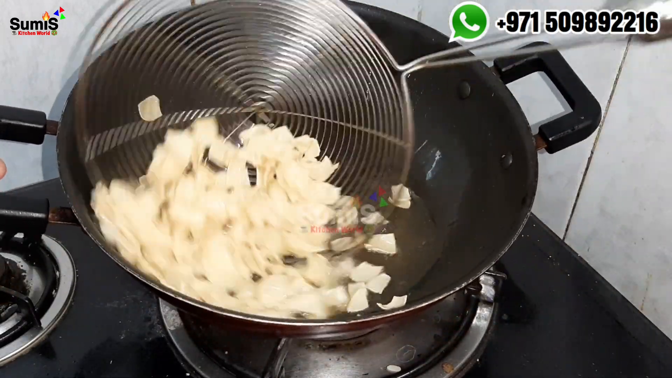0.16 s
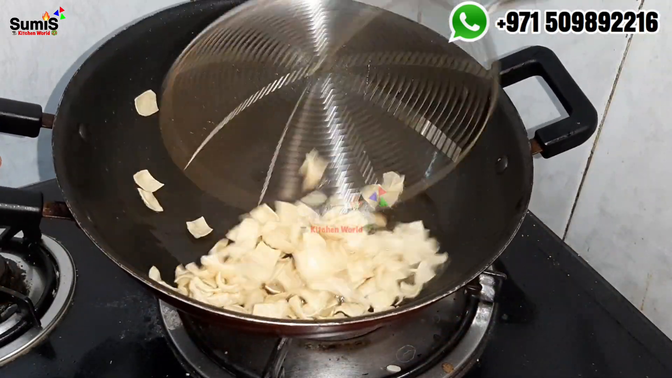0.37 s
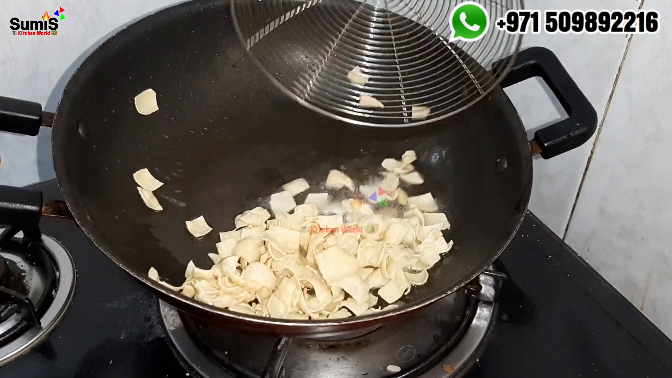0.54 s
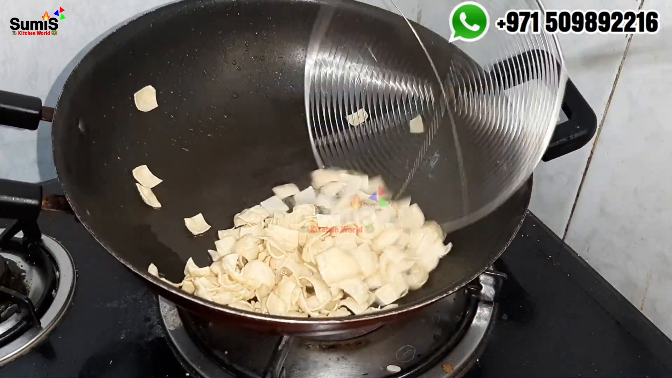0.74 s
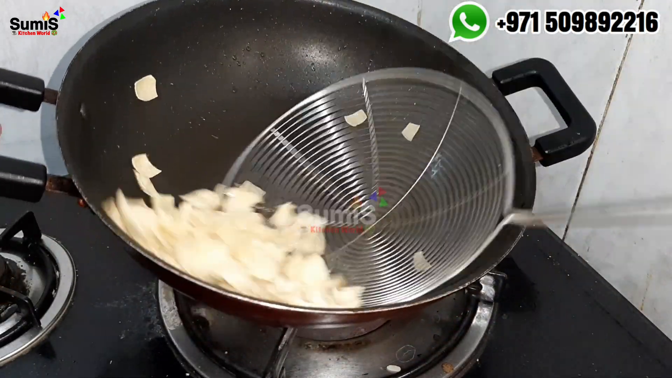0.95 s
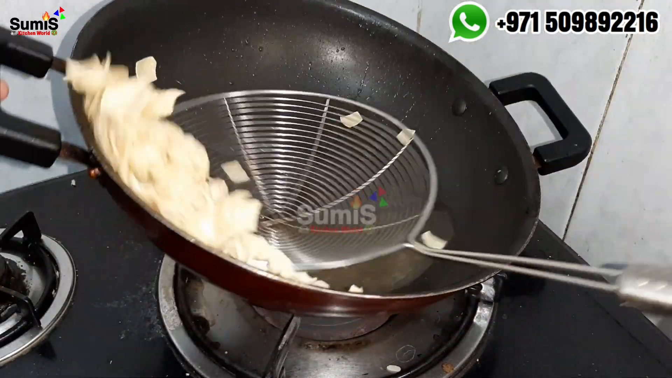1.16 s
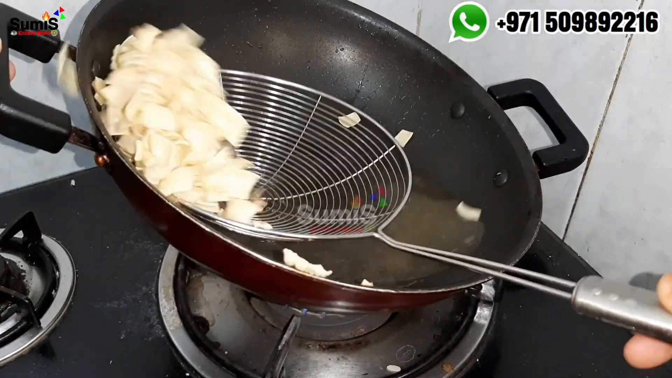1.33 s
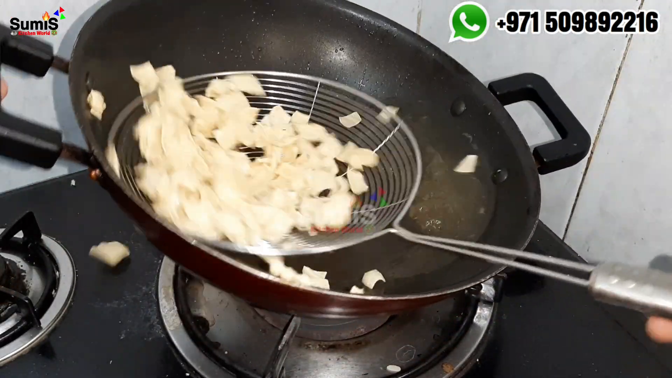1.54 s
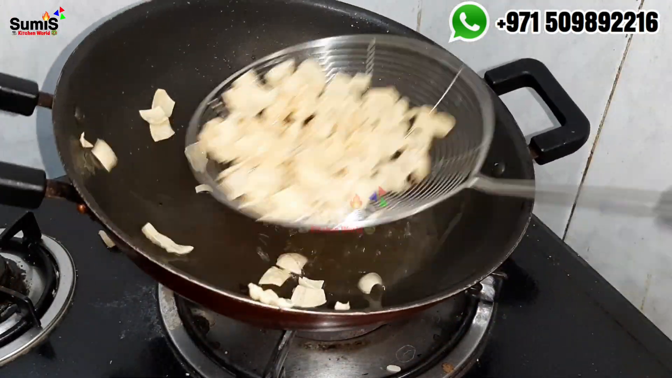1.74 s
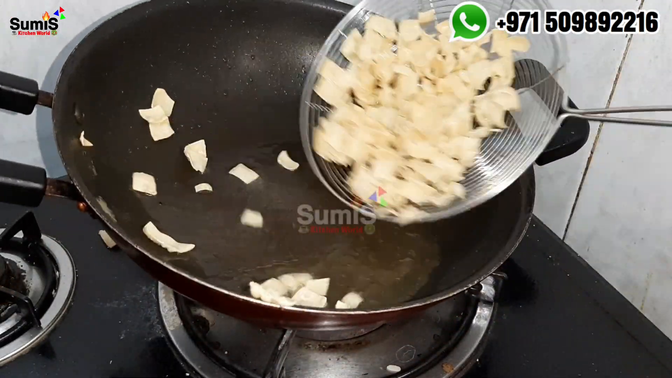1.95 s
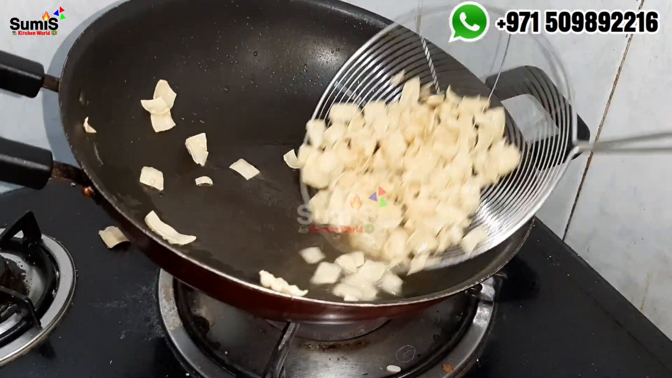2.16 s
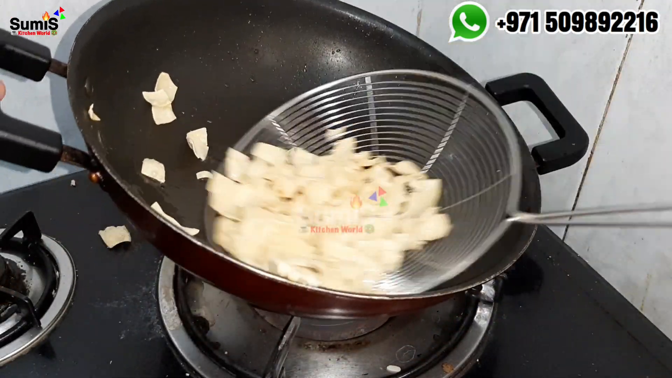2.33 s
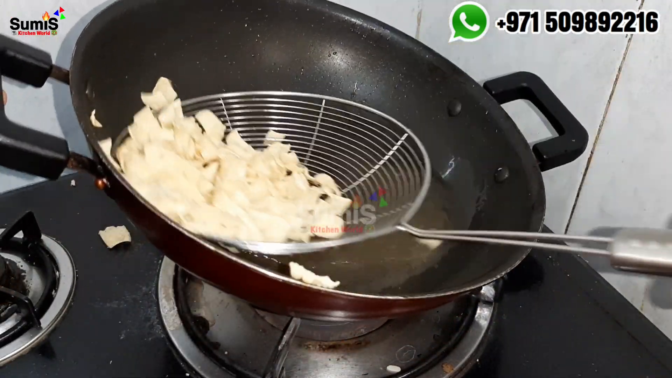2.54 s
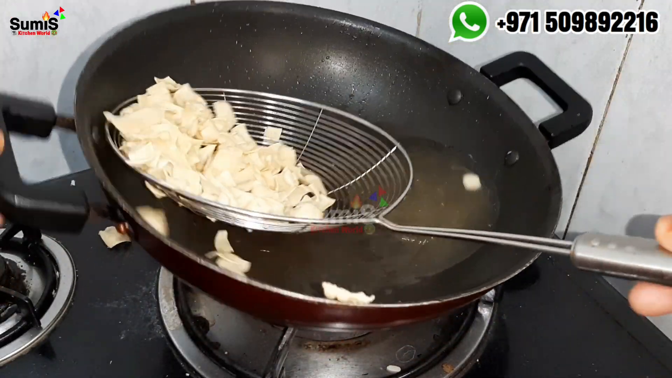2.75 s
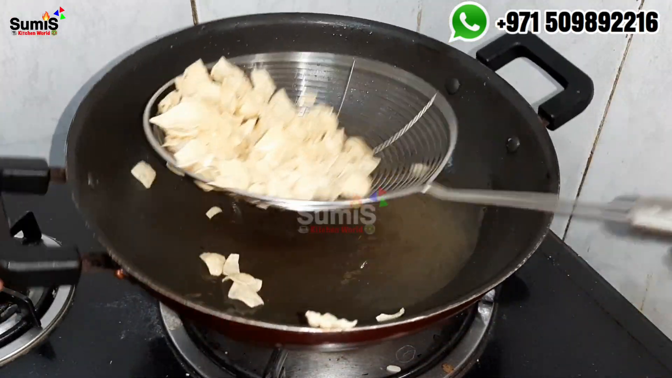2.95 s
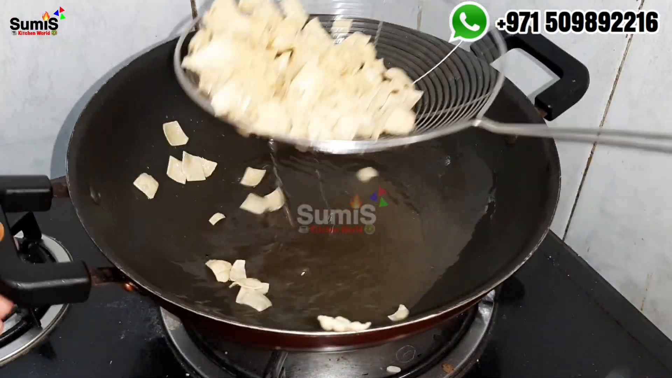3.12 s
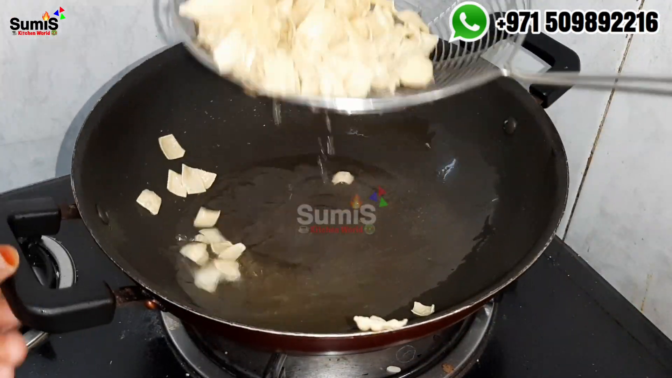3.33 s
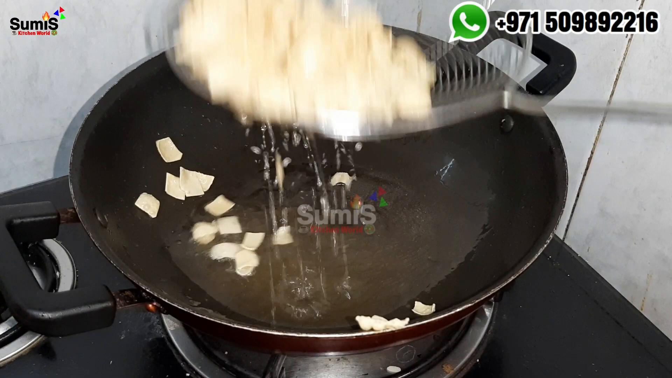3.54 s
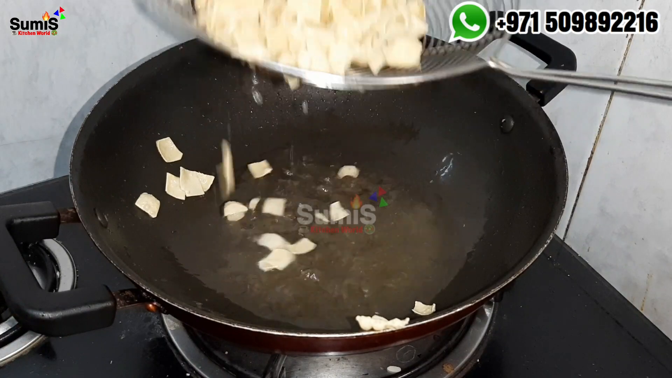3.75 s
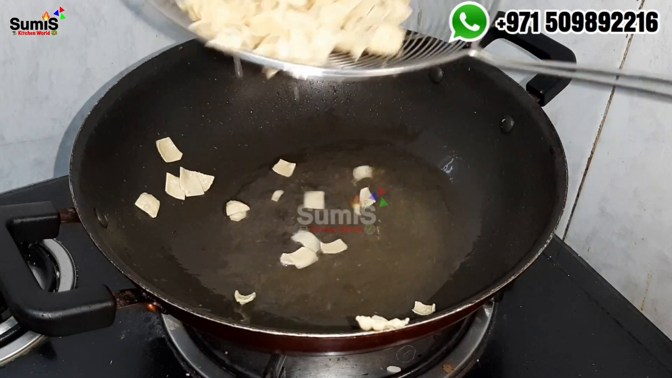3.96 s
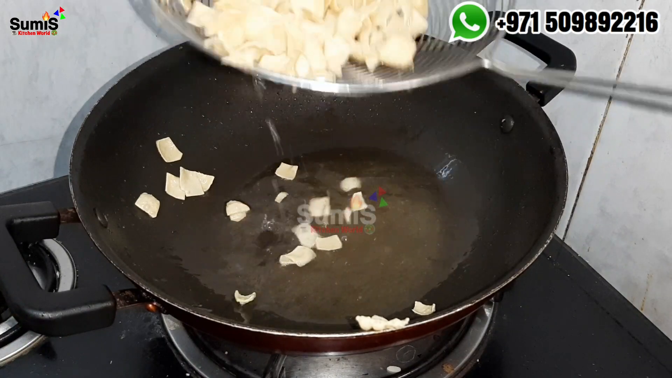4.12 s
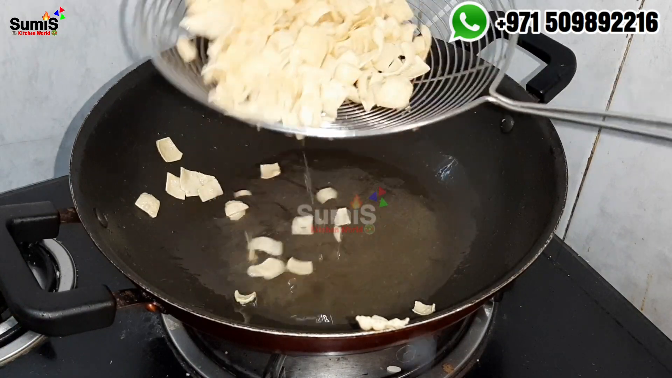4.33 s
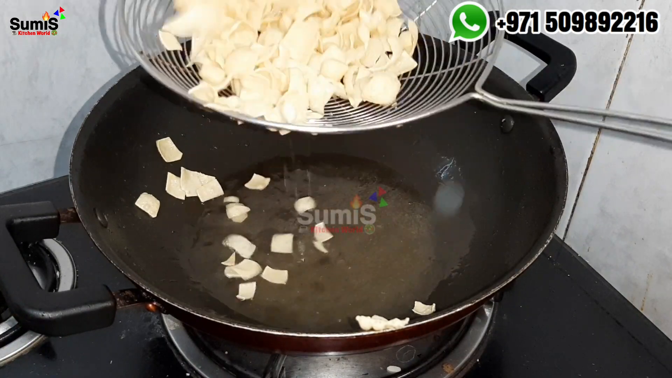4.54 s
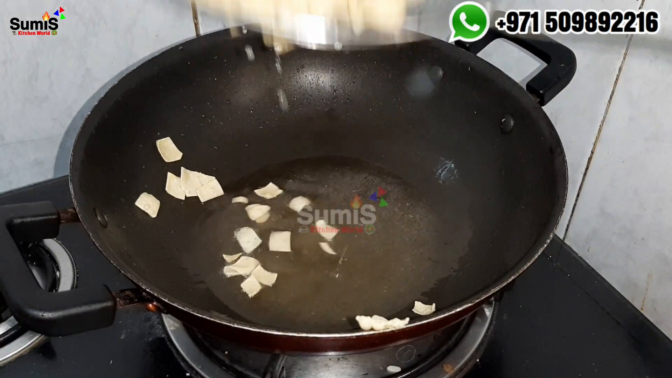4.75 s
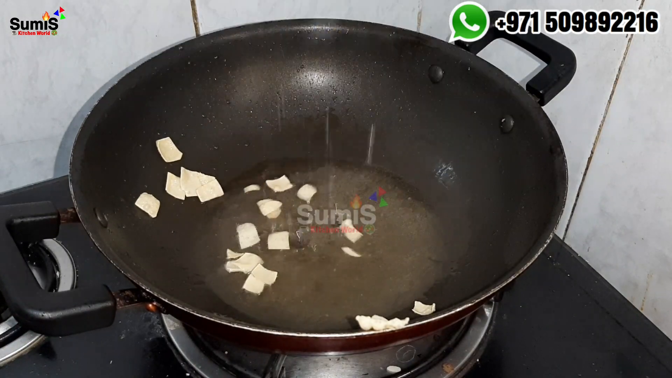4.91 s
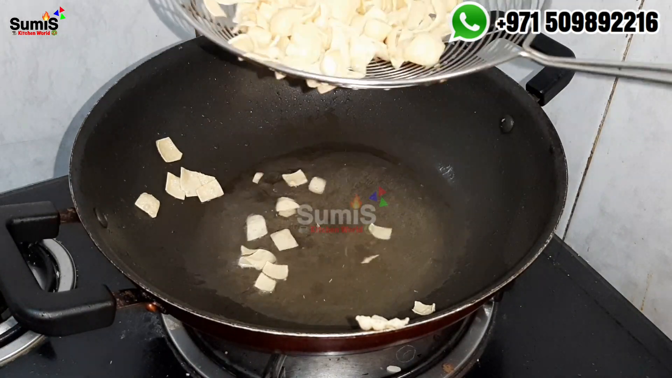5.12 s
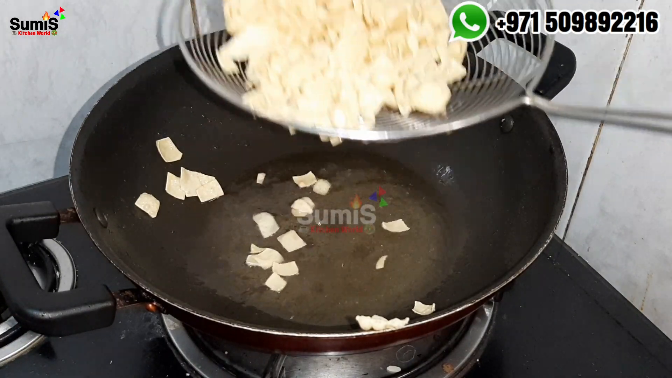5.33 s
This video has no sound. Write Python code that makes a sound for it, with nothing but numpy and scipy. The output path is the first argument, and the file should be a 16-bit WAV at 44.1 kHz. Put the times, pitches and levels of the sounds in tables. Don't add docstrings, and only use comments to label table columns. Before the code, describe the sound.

In a small tiled kitchen, food fries in an iron wok over a low gas roar. A wire strainer scrapes and raps quickly, oil pops, rods clink on the rim and one tap rings hard. At three seconds the wok clanks on its burner ring; the flame swells, then the sizzle fades with a few light knocks and ticks. Close stereo phone pickup.

```python
import sys
import numpy as np
from scipy import signal
from scipy.fft import rfft, irfft
from scipy.io import wavfile
from scipy.ndimage import uniform_filter1d

SR = 44100
rng = np.random.default_rng(int(sys.argv[2]) if len(sys.argv) > 2 else 0)


def gain_from_db(level_db):
    decades = np.asarray(level_db, float) / 20
    return 10 ** decades


def dump(signal):
    limited = np.clip(np.atleast_2d(signal).T, -1, 1)
    pcm = np.round(limited * 32767).astype(np.int16)
    wavfile.write(sys.argv[1], SR, pcm)


N = 237301
TIME_S = np.arange(N) / SR

# [f/Hz, left-right correlation]
PORT_LIKENESS = [(25, .998), (60, 1), (250, 0.94), (500, 0.58), (1000, 0.071), (2000, 0.024),
                 (5000, 0.0069), (15000, 0.013)]
# [f/Hz, left minus right/dB]
PORT_TILT = [(60, -9), (110, -2.5), (200, -14), (380, -1), (700, -14), (1290, -8.5), (2380, -6.5),
             (4400, -16), (8120, -6.5), (15000, -9)]
# [f/Hz, t60/s]
TILE_T60 = [(100, .5), (500, .42), (2000, .34), (5000, .33), (8000, .28), (12000, .17)]
# [t/s, level/dB]
FLAME_LEVEL = [(0.0, -51), (0.37, -48), (0.61, -43), (0.81, -45.5), (1.36, -46.5), (1.54, -48.5),
               (2.61, -52.5), (3.1, -40.5), (3.46, -46), (3.8, -44.5), (3.95, -49), (5.38, -54)]
# [f/Hz, density/dB per Hz]
ROAR_SPECTRUM = [(16, -42), (28, -84), (47, -2.5), (92, 1), (151, -1.5), (172, -7), (199, -6), (270, -16.5),
                 (294, -19), (340, -10), (423, -12), (462, -24), (599, -20.5), (756, -25), (900, -26.5),
                 (1170, -41), (1980, -120)]
# [f/Hz, width/Hz, rms level/dB]
HUM_LINES = [(63.9, 13.4, -58), (97.08, 3.6, -54.5), (149.8, 1.86, -62.5), (199.7, 8.6, -63.5),
             (337.7, 21, -68.5), (420, 6.7, -73.5), (1547, 74, -71)]
# [t/s, peak level/dB, f/Hz, rattle/dB, t60/s]
STOVE_BUMPS = [(0.019, -26, 117, -16, 0.24), (0.419, -43, 122, -23, 0.28), (0.563, -39, 112, -32, 0.16),
               (1.426, -38, 96, -14, 0.58), (2.039, -28.5, 115, 1.5, 0.3), (2.4, -44.5, 101, -33, 0.89),
               (3.045, -37.5, 139, -30, 0.33), (3.719, -42, 169, -12.5, 0.17),
               (3.798, -30.5, 140, -12.5, 0.27), (4.434, -32, 157, -13, 0.29), (4.791, -44, 127, -34, 0.37),
               (5.089, -46.5, 113, -34, 0.32)]
# [t/s, peak level/dB, crack above it/dB, crack f/Hz, dulling/dB per octave]
WOK_KNOCKS = [
    (3.0379, -7.5, 0, 3170, 2.5),
    (3.422, -27.5, -9.5, 1850, 4.5),
]
# [f/Hz, level/dB, t60/s]
WOK_MODES = [(324.5, -3.5, 0.33), (378.5, -1.5, 0.36), (444, -2.5, 0.21), (483.6, -1.5, 0.32),
             (592.4, -4, 0.38), (648, -16, 0.77), (820, -27, .25), (890, 2, 0.12), (1051, -5, 0.27),
             (1490, -5, 0.36), (1543, 5.5, 0.13), (2060, 14, 0.046), (2062, -1, 0.053), (3310, 2.5, 0.13),
             (3860, -23, 0.18)]
# [t/s, peak level/dB, ring length factor]
ROD_CLINKS = [
    (1.4341, -30, 0.89),
    (2.4944, -19.5, 0.79),
]
# [f/Hz, level/dB, t60/s]
ROD_MODES = [(3970, 0, .17), (4030, -7, .12), (4240, -7, .12), (4800, -11, .1), (3720, -11, .1),
             (5400, -16, .04), (7700, -14, .04), (8390, -13, .04)]
# [t/s, peak level/dB, ring above tick/dB, ring length factor, struck spot f/Hz]
RIM_TAPS = [(0.2572, -27, 1.5, 0.55, 1720), (0.5543, -18.5, -3, 0.76, 1354), (.601, -25, -1.5, 0.54, 1890),
            (0.665, -16, -10, 0.29, 850), (0.7279, -15, -13.5, 0.39, 1860), (.847, -53.5, 0, 0.41, 1200),
            (2.0046, -24, -6, 0.54, 1250), (2.0234, -31, -10, 0.31, 1300),
            (2.0398, -5.5, -10.5, 1.07, 1250), (2.2411, -22.5, -9.5, 1.8, 1250),
            (2.7394, -24, -22, 0.69, 1260), (4.6817, -32.5, -1.5, 0.31, 2440),
            (5.051, -30.5, -14.5, 0.23, 3700)]
# [f/Hz, level/dB, t60/s]
WIRE_MODES = [(1185, 12, 0.16), (1246, -2.5, 1), (1247, 12, 0.33), (850, 13.5, 0.19), (1350, 1, 0.96),
              (1560, -33, .15), (1706, 18.5, 0.12), (2036, 23, 0.19), (2128, 20.5, 0.11), (2430, 23, 0.081),
              (2900, 11, 0.22), (3560, -21, .12), (4370, -4, .2), (5060, 12, .15), (5370, -8, .12),
              (5800, -16, .1), (6500, -32, .15), (7060, -12.5, .15)]
# [t/s, length/s, grit level/dB, wire ring above it/dB, wall rub above it/dB]
WIRE_STROKES = [
    (0.011, 0.041, -42.5, -20, 4.5),
    (0.57, 0.19, -49.5, 6, 4.5),
    (0.715, 0.025, -29, -18, -7),
    (.805, 0.04, -36, -9, -33),
    (1.03, 0.036, -44, -15, -13),
    (1.285, .03, -66, 24, -4),
    (1.445, 0.014, -57, 15, -2),
    (2.244, 0.012, -44.5, 11, -30),
    (2.696, 0.045, -60.5, 9, 11),
]
# [t/s, peak level/dB,
# f/Hz, width/octaves]
STEAM_POPS = [(0.1174, -22, 13700, 0.35), (0.174, -25, 11500, 0.4), (0.188, -21.5, 7440, 0.42),
              (0.2577, -26.5, 7850, 0.26), (0.298, -27.5, 5900, 0.35), (0.358, -23, 7080, 0.13),
              (0.425, -23.5, 9490, 0.35), (0.9306, -21.5, 5200, 0.94), (0.9844, -26, 6700, 0.59),
              (1.071, -30, 11600, 0.3), (1.0956, -18.5, 5760, 0.56), (1.183, -18, 6500, 0.13),
              (1.244, -20.5, 10100, 0.51), (1.435, -15.5, 4240, 0.75), (1.491, -19.5, 11100, 0.48),
              (1.531, -28, 7300, 0.19), (1.5685, -22, 13800, 0.24), (1.6022, -26.5, 7200, 0.32),
              (1.7738, -20, 10670, 0.36), (1.854, -28, 10900, 0.36), (1.912, -26, 5800, 0.68),
              (1.9296, -27.5, 5200, 0.5), (1.9865, -20, 6940, 0.36), (2.215, -22.5, 6200, 0.28),
              (2.2278, -22.5, 6600, 0.53), (2.335, -28.5, 5370, 0.4), (2.4955, -12.5, 4350, 0.46),
              (3.676, -27, 10900, 0.54), (3.8694, -38, 7600, 0.39), (4.885, -37.5, 5570, 0.7)]
# [t/s, level/dB]
OIL_VIGOUR = [(0.0, -44.5), (0.55, -46.5), (0.79, -44.5), (1.06, -46), (1.42, -42.5), (1.63, -45),
              (1.9, -46.5), (2.16, -45.5), (2.29, -49.5), (2.55, -42.5), (2.82, -48.5), (3.18, -51),
              (3.45, -52.5), (3.8, -54.5), (4.22, -56.5), (5.03, -59), (5.38, -61)]
# [f/Hz, density/dB per Hz]
SPRAY_SPECTRUM = [(400, -65), (775, -19), (1300, -7.5), (1800, -8.5), (2400, -2), (7400, 0), (11000, 0),
                  (13500, 3.5), (15400, 1.5), (15750, -17), (16500, -39)]
# [f/Hz, density/dB per Hz]
BUBBLE_SPECTRUM = [(700, -7), (1500, 5.5), (2500, 4.5), (4000, 4.5), (6000, 5.5), (8000, 3.5), (11000, -63),
                   (15000, -39)]
# [middle t/s, length/s, large bubble level/dB]
FOOD_DIPS = [
    (.8, 0.85, 9),
    (1.58, 0.8, -5.5),
    (2.296, 0.18, 12),
    (2.618, 0.11, -8),
    (3.45, 0.35, -5),
]

LARGE_DB = -2
POP_RING_S, POP_ECHO_DB, POP_ECHO_DB_PER_OCTAVE = 0.02, -5, 23
TICK_HZ, TICK_OCTAVES_PER_DB = 3060, .05
RIM_ATTACK_S = .0015
DAMPED_AFTER_S, DAMPED_T60_S = 0.099, 0.086
STROKE_RISE_DB_S, STROKE_FALL_DB_S = 700, 303
RESTING_DB, LIFTED_S = [-73, -83, -56.5], 3.03
RATTLE_HZ = 1250
TOP_HZ, ABOVE_TOP_DB = 15700, -22


def along(table, column):
    rows = np.array(table)
    return np.interp(TIME_S, rows[:, 0], rows[:, column])


def at(table, hz):
    rows = np.array(table, float)
    return np.interp(np.log(np.maximum(hz, 1)), np.log(rows[:, 0]), rows[:, 1])


def bins(size):
    return np.arange(size // 2 + 1) * SR / size


def colour(x, table):
    size = x.shape[-1]
    y = irfft(rfft(x) * gain_from_db(at(table, bins(size))), size)
    return y / np.sqrt(np.mean(y ** 2))


def pair(size):
    like = np.clip(at(PORT_LIKENESS, bins(size)), 0, 1)
    mid, side = rfft(rng.standard_normal((2, size)))
    mid = mid * np.sqrt((1 + like) / 2)
    side = side * np.sqrt((1 - like) / 2)
    return irfft(np.array([mid + side, mid - side]), size)


def walk(rate_hz):
    hold = int(SR / rate_hz)
    levels = np.repeat(rng.standard_normal(N // hold + 1), hold)
    return 1.44 * uniform_filter1d(levels, hold)[:N]


def fade(t, t60_s):
    return gain_from_db(-60 * t / np.maximum(t60_s, 1e-3))


def band(x, hz, octaves):
    edges_hz = np.clip(hz * 2 ** np.array([-octaves / 2, octaves / 2]), 20, .48 * SR)
    return signal.sosfilt(signal.butter(2, edges_hz, "band", fs=SR, output="sos"), x)


def snap(size, t60_s, wake):
    noise = wake * rng.standard_normal(size)
    noise[0] = 1
    return noise * fade(TIME_S[:size], t60_s)


def ring(modes, stretch, scatter_db):
    t = TIME_S[:SR // 2]
    hz, db, t60_s = np.transpose(modes)[:, :, None]
    chance = rng.standard_normal((2, len(modes), 1))
    gain = gain_from_db(db + scatter_db * chance[0]) * fade(t, t60_s * stretch)
    return (gain * np.sin(2 * np.pi * hz * (1 + 0.0023 * chance[1]) * t)).sum(0)


def add(bus, s, sound, db, pan_db=0., order=4):
    sound = sound * gain_from_db(db) / np.abs(sound).max()
    for port, (lag, sign) in enumerate([(0, 1), (order, -1)]):
        i = int(s * SR) + lag
        bus[port, i:i + len(sound)] += (sound * gain_from_db(sign * pan_db / 2))[:N - i]


def kitchen(send):
    t = TIME_S[:SR // 2]
    tail = 0
    for hz in 60 * 2. ** np.arange(9):
        tail = tail + band(pair(len(t)), hz, 1) * fade(t, at(TILE_T60, hz))
    tail = tail * np.clip((t - .002) / 0.0098, 0, 1)
    tail = tail / np.sqrt(np.sum(tail ** 2) / 2)
    return signal.fftconvolve(send.mean(0, keepdims=True), tail, axes=1)[:, :N]


def flame():
    noise = pair(N)
    hum = 0
    for hz, width_hz, db in HUM_LINES:
        line = band(noise, hz, width_hz / hz)
        hum = hum + gain_from_db(db) * line / line.std()
    flame_db = along(FLAME_LEVEL, column=1)
    roar = colour(pair(N), ROAR_SPECTRUM) * gain_from_db(flame_db + 2.0 * walk(22) - 3.0)
    return roar + hum * gain_from_db(0.4 * (flame_db + 48))


def bumps(dry, send):
    t = TIME_S[:SR // 2]
    for s, db, hz, rattle_db, t60_s in STOVE_BUMPS:
        noise = rng.standard_normal((2, len(t))) * fade(t, t60_s) * np.clip(t / 0.0067, 0, 1)
        thud = band(noise[0], hz, 1.76)
        rattle = band(band(noise[1], RATTLE_HZ, 0.96), RATTLE_HZ, 0.95)
        sound = thud / thud.std() + gain_from_db(rattle_db) * rattle / rattle.std()
        add(dry, s, sound, db + 4.5)
        add(send, s, sound, db - 6.5)


def wok(dry, send):
    for s, db, crack_db, crack_hz, dull_db in WOK_KNOCKS:
        dulled = [(hz, mode_db - dull_db * np.log2(hz / 400), t60_s) for hz, mode_db, t60_s in WOK_MODES]
        modes = ring(dulled, 1, scatter_db=0)
        t = TIME_S[:len(modes)]
        thud = band(rng.standard_normal(len(t)), 498.0, 1.2) * fade(t, 0.27)
        bowl = modes / modes.std() + gain_from_db(-1.5) * thud / thud.std()
        bowl = bowl * np.clip(t / 0.0055, 0, 1)
        add(dry, s, bowl, db - 8.0)
        add(send, s, bowl, db - 13)
        add(dry, s, band(snap(4096, 0.032, wake=0.14), crack_hz, 2.75), db + crack_db, -2, order=1)
        add(send, s, band(snap(4096, .03, wake=0), crack_hz, 1.8), db + crack_db + 9)


def rods(dry, send):
    for s, db, stretch in ROD_CLINKS:
        modes = ring(ROD_MODES, stretch, scatter_db=0)
        add(dry, s, modes, db, -1., order=0)
        add(send, s, modes, db + 6)


def strainer(dry, send):
    for s, db, ring_db, stretch, spot_hz in RIM_TAPS:
        near = [(hz, mode_db - 11 * abs(np.log2(hz / spot_hz)), t60_s) for hz, mode_db, t60_s in WIRE_MODES]
        modes = ring(near, stretch, scatter_db=1.5)
        t = TIME_S[:len(modes)]
        modes = modes * fade(np.maximum(t - DAMPED_AFTER_S, 0), DAMPED_T60_S) * np.clip(t / RIM_ATTACK_S, 0, 1)
        tick_hz = TICK_HZ * 2 ** (-TICK_OCTAVES_PER_DB * ring_db)
        tick = band(snap(4096, 0.031, wake=0.47), 1.44 * tick_hz, 3.2)
        add(dry, s, band(tick, 1.44 * tick_hz, 3.2), db, -3, order=1)
        add(send, s, band(snap(4096, .03, wake=0), 1.15 * tick_hz, 1.65), db + 8)
        add(dry, s, modes, db + ring_db, -2.5)
        add(send, s, modes, db + ring_db - 10)


def scraping():
    chance = rng.random((2, N))
    strength = gain_from_db(-3 * np.log(chance[1] + 1e-9))
    slips = (chance[0] < 1500 / SR) * strength * np.sign(chance[0] - 750 / SR)
    wire = signal.fftconvolve(slips, ring(WIRE_MODES[:3], .5, scatter_db=0)[:8192])[:N]
    layers = band(slips, 1410.0, 1.57), wire, band(slips, 530.0, 1.88)
    force = gain_from_db(np.array(RESTING_DB)[:, None]) * (TIME_S < LIFTED_S)
    for s, length_s, db, wire_db, wall_db in WIRE_STROKES:
        rise_db = -STROKE_RISE_DB_S * np.maximum(s - TIME_S, 0)
        fall_db = -STROKE_FALL_DB_S * np.maximum(TIME_S - s - length_s, 0)
        force = force + gain_from_db(db + np.array([[0], [wire_db], [wall_db]]) + rise_db + fall_db)
    return sum(layer / layer.std() * gain for layer, gain in zip(layers, force))


def pops(dry, send):
    for s, db, hz, octaves in STEAM_POPS:
        octaves = np.clip(octaves, .1, 2)
        body = band(snap(2048, POP_RING_S, wake=.3), hz, octaves)
        crack = band(snap(2048, .01, wake=.3), hz, 2.4)
        burst = body / np.abs(body).max() + gain_from_db(-2.5) * crack / np.abs(crack).max()
        add(dry, s, burst, db, -3., order=1)
        echo_db = db + POP_ECHO_DB + POP_ECHO_DB_PER_OCTAVE * octaves
        add(send, s, band(snap(2048, POP_RING_S, wake=0), hz, octaves), echo_db)


def fizz(table, rate_hz, spread_db, share_db, flicker_db):
    out, swell, noise = 0, walk(18), pair(N)
    for hz in 600 * 2 ** np.arange(0, 5, .5):
        chance = rng.random((4, N))
        size_db = np.minimum(-spread_db * np.log(chance[1] + 1e-9), 12)
        bursts = (chance[0] < rate_hz / SR) * gain_from_db(size_db) * np.sign(chance[3] - .5)
        bursts = bursts * np.array([chance[2], 1 - chance[2]])
        bursts[1] = np.roll(bursts[1], rng.integers(-4, 12))
        mass = np.roll(noise, rng.integers(N), axis=1)
        mass = mass + gain_from_db(share_db) * bursts / np.sqrt(np.mean(bursts ** 2))
        out = out + band(mass, hz, 0.57) * gain_from_db(flicker_db * (.7 * swell + walk(25.24) + walk(7)))
    return colour(out, table)


def oil():
    spray = fizz(SPRAY_SPECTRUM, rate_hz=150., spread_db=4., share_db=-7, flicker_db=.8)
    larger = fizz(BUBBLE_SPECTRUM, rate_hz=120., spread_db=3.5, share_db=-7, flicker_db=1.)
    dip_db = sum(db * np.exp(-(2 * (TIME_S - s) / length_s) ** 2) for s, length_s, db in FOOD_DIPS)
    return (spray * gain_from_db(5) + larger * gain_from_db(LARGE_DB + dip_db + 1)) * gain_from_db(along(OIL_VIGOUR, column=1))


def scene():
    rub = scraping() * np.ones((2, 1))
    dry, send = rub * gain_from_db(-9.0), rub * gain_from_db(-6.5)
    for source in (bumps, wok, rods, strainer, pops):
        source(dry, send)
    return flame() + kitchen(send) + dry + oil()


def band_limit(x):
    return signal.sosfilt(signal.butter(12, 16640, fs=SR, output="sos"), x)


def record(dry):
    hz = bins(N)
    case_db = -7 / (1 + ((hz - 8700) / 350) ** 2) + ABOVE_TOP_DB * (hz > TOP_HZ)
    port_db = np.array([[.5], [-.5]]) * 0.21 * at(PORT_TILT, hz)
    mix = irfft(rfft(dry) * gain_from_db(case_db + port_db), N)
    return band_limit(mix)


dry = scene()
out = record(dry)
dump(out)
```